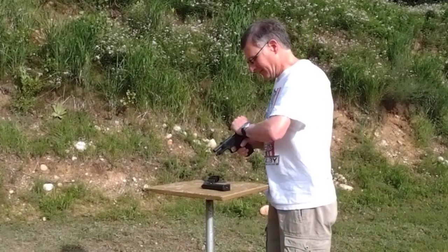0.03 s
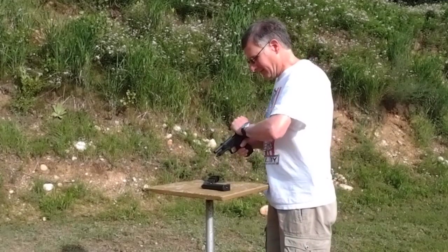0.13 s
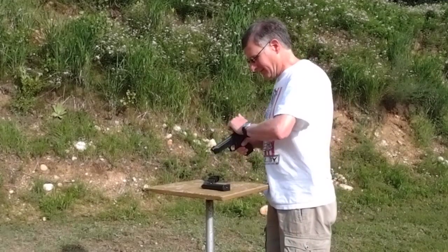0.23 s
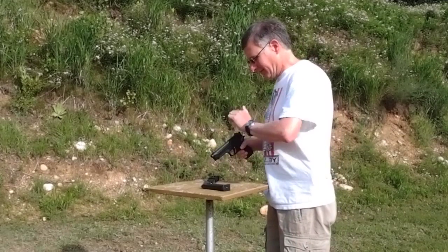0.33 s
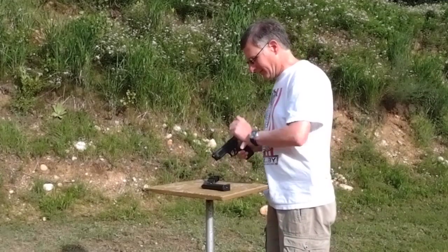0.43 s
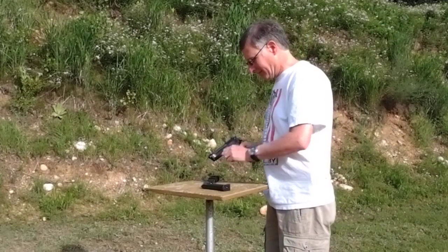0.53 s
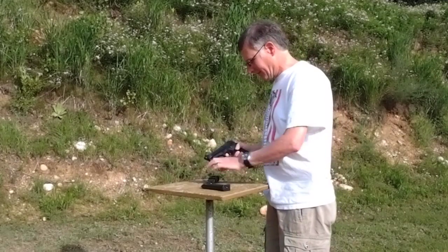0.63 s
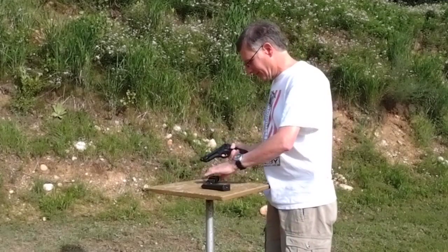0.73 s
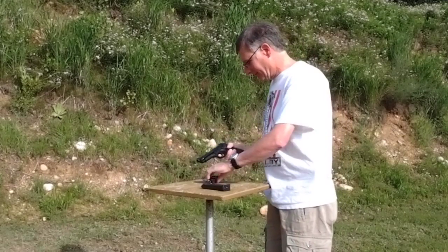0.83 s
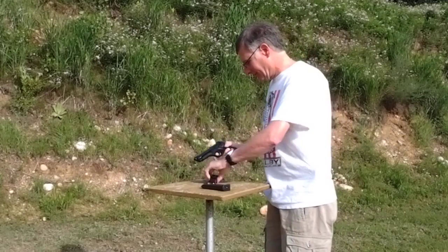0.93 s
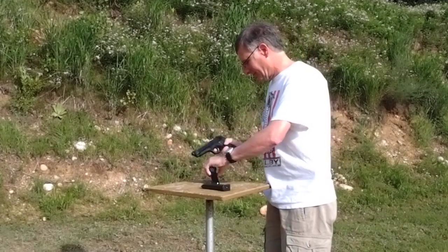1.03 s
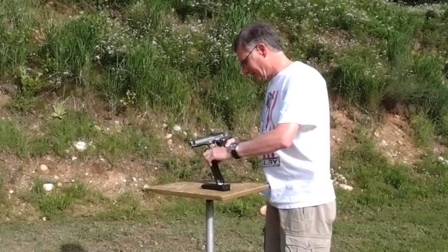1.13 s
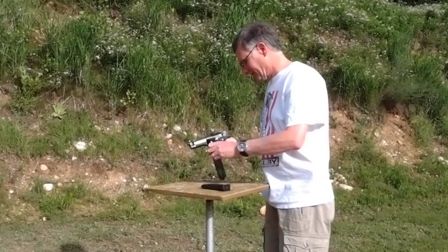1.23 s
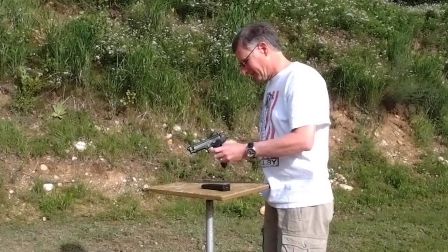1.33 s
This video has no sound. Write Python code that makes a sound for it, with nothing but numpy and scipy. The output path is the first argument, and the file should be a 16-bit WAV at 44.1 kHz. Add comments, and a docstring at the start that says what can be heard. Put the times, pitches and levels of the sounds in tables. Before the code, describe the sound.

Sharp metallic slam of a pistol slide in quiet open air, preceded by faint ticks and a thin squeak, followed by diffuse outdoor reflections, a duller echo, slight cloth rustle, a small click and a magazine tapping wood.

```python
"""A pistol at an outdoor range, over quiet open air with a low distant hum: shaped noise and one sine.
First the grassy bank still scatters an earlier clack, as fading noise, while the steel ticks under the hand.
Then the slide squeaks, rubs along its rails and slams shut: noise bursts and ringing modes that overload
the microphone. The ground echoes the slam softly, the bank returns a wash of noise and a later, duller echo.
Last a sleeve rustles, steel clicks faintly and a magazine knocks on a wooden table, a sum of dying sines."""
import sys
import numpy as np
from scipy import signal
from scipy.fft import rfft, irfft
from scipy.io import wavfile

SR = 44100
rng = np.random.default_rng(int(sys.argv[2]) if len(sys.argv) > 2 else 0)


def digitize_waveform(pressure):
    """Quantize a signal to 16-bit integers and store it at the path in sys.argv[1].

    Rows of a 2-D input are taken as channels; values are limited to [-1, 1].
    """
    field = np.atleast_2d(pressure).T
    bounded = np.clip(field, -1, 1)
    quanta = np.round(bounded * 32767).astype(np.int16)
    wavfile.write(sys.argv[1], SR, quanta)


N = 61740  # length in samples

# Quiet outdoor air. Each row: frequency in Hz, relative level in dB per Hz.
AIR_SPECTRUM = [(30, -26), (45, -3), (75, 1), (120, 2.5), (180, -3), (400, -6.5), (800, -11), (1250, -15.5),
                (3000, -19.5), (7000, -23.5), (8500, -28), (9400, -34.5), (12400, -34.5), (14000, -27.5),
                (15500, -25)]
# Slow swell of the air. Each row: time in seconds, change of level in dB.
AIR_SWELL = [(0, -0.5), (0.2, -0.5), (0.55, 1), (1.0, 1.5), (1.4, 1)]
AIR_DB = -55  # rms before the swell
HUM_HZ, HUM_DB = 54, -62

# Colour of the earlier clack's scatter. Each row: frequency in Hz, relative level in dB per Hz.
EARLIER_SPECTRUM = [(300, -23.5), (1500, -9), (2500, -3), (7000, 0.5), (9500, -4), (15000, -0.5)]
EARLIER_DB = -45.5

# Magazine on the table. Each row: start in seconds, level in dB.
KNOCKS = [(1.078, -56), (1.096, -46)]
# Modes of the wooden top. Each row: frequency in Hz, relative level in dB, 60 dB decay in seconds.
TABLE_MODES = [(282.5, -21, .08), (478.5, -0.5, 0.28), (775, -3, 0.03)]
# Cloth of the sleeve. Each row: frequency in Hz, relative level in dB per Hz.
RUSTLE_SPECTRUM = [(80, -4), (250, 5), (700, 7), (1500, -8.5), (5000, -47), (15000, -32)]
RUSTLE_S, RUSTLE_WIDTH_S, RUSTLE_DB = 1.07, 0.23, -60.5  # centre, half width to 1/e, peak rms

# Scatter from the grassy bank. Each row: frequency in Hz, relative level in dB per Hz.
BANK_SPECTRUM = [(100, -32), (600, -23.5), (1200, -15), (1800, -11), (2300, 1), (3500, -1.5), (4450, 2.5),
                 (5400, -1), (7000, 2), (8300, 1.5), (9600, -3.5), (11300, 1), (14000, 0.5), (15700, -2.5)]
BANK_DB, BANK_RISE_S, BANK_HOLD_S = -23, .028, .045  # the hold counts from the sound, rise included
BANK_T60_S, BANK_TREBLE_T60_S = 0.6, .33
BANK_GRAIN_DB, BANK_GRAINS_PER_S = 1.5, 350
BANK_RING_DB, BANK_RING_T60_S = -27.5, 0.47
# the far echo and the trees are set against the bank's peak
FAR_ECHO_S, FAR_ECHO_WIDTH_S, FAR_ECHO_DB, FAR_TREBLE_DB = .222, 0.016, -16.5, -7.5
TREES_DB, TREES_T60_S = -19, .9  # fainter, longer scatter from further off

# The slide rubs along its rails. Each row: time in seconds, level in dB.
RUB_LEVEL = [(0.186, -63.5), (0.195, -48), (0.210, -50), (0.216, -46.5), (0.222, -29.5), (0.227, -32.5),
             (0.230, -70.5)]
# Colour of the rub. Each row: frequency in Hz, relative level in dB per Hz.
RUB_SPECTRUM = [(200, -28), (1200, -11), (2300, 0), (4300, -7), (7000, -6.5), (10000, -15), (15000, -10)]
RUB_GRAIN_DB, RUB_GRAINS_PER_S = 2.0, 900
# Faint squeak as the slide starts to move. Each row: time in seconds, pitch in Hz, level in dB.
SQUEAK = [(0.134, 3650, -70), (0.145, 3900, -57), (0.156, 4250, -70), (0.17, 4850, -63.5),
          (0.182, 4750, -60), (0.191, 4590, -66.5)]
SQUEAK_ROUGH = .025  # pitch wobble, as a fraction of the pitch

# Steel contacts of the slide, with the slam's soft, diffuse echo off the ground at 0.235 and 0.236.
# Each row: start in seconds, relative level in dB, treble lift in dB, thud lift in dB (weighted in
# steel()), 60 dB decay of the clatter in seconds, relative level of the ringing modes in dB,
# pitch in Hz near which they ring most.
CLACKS = [(0.2146, -32, -7, -2, .02, -3, 3400), (0.2177, -17.5, -8, -8.5, .016, -3.5, 3430),
          (0.2188, -14, -8, -3.5, .014, 1.5, 3700), (0.2272, -0.5, 3.5, -4, .017, 2, 4800),
          (0.2350, -18, 3, 6, .022, 2, 2450), (0.2360, -18.5, -7, 1, .016, 6.5, 3200),
          (0.2388, -6.5, 6, -0.5, 0.017, -2.5, 11300), (0.2428, -20.5, 4, -4.5, .010, -5.5, 11340),
          (0.2448, -16.5, -8, 4, .011, -6, 11340)]
# Light handling ticks. Each row: start in seconds, relative level in dB, treble lift in dB,
# thud lift in dB, clatter decay in seconds, ringing modes in dB, favoured pitch in Hz.
TICKS = [(0.0515, -51, -10.5, 12, 0.023, -1.5, 2496), (0.0615, -45, -20, 3, 0.026, -0.5, 2587),
         (0.0740, -53, -13.5, 8, .025, 6.5, 1414), (0.1070, -52, -13, 1, .02, 1, 1400),
         (0.1115, -47, -17, -0.5, .02, 10, 1407), (0.1972, -33, -10, -13, .016, 6, 2400),
         (0.9900, -42.5, -10.5, 3.5, 0.019, 0, 5930), (0.9975, -50, -28, 1, .03, 1.5, 3200)]
# Ringing of slide and barrel. Each row: frequency in Hz, relative level in dB, 60 dB decay in seconds.
STEEL_MODES = [(1061, -25, .04), (1268, -20, .05), (1608, -21, .045), (2448, -18, .035),
               (2576, -20.5, 0.035), (3623, -14, .014), (4263, -27, 0.078), (4473, -15.5, .03),
               (4910, -15.5, .016), (5840, -15.5, .02), (8116, -21, 0.053), (8650, -16.5, 0.032),
               (11370, -14, .036), (11360, -24.5, .036), (11700, -24.5, 0.011), (14425, -19, 0.021)]
# Dense short-lived modes of the whole gun. Each row: frequency in Hz, relative level in dB per Hz.
CLATTER_SPECTRUM = [(100, -40), (400, -27.5), (800, -12), (1300, -14.5), (2000, -6.5), (2700, -5.5),
                    (3700, 0.5), (4900, -4), (6800, -7), (8500, -10.5), (9600, -9.5), (12000, 0),
                    (14000, -6), (16000, -10)]
TREBLE_HZ, THUD_HZ = 7100, 1900
CLATTER_DB, CRACK_DB, CRACK_T60_S = -5.5, 3.5, .0045
FOCUS_DB, FOCUS_OCTAVES = 9, .35  # lift of the modes near the favoured pitch
MODE_SPREAD_DB = 3.5  # chance spread of the modes, standard deviation
BODY_CUT_HZ = 600  # the small gun radiates little bass

OVERLOAD = 1.05  # ceiling of the soft clipping
BASS_SHELF_DB, BASS_SHELF_HZ = -5.5, 800  # the microphone is lean in the bass
CUTOFF_HZ = 15750


def from_db(db):
    """Decibels to gain."""
    return 10 ** (np.asarray(db) / 20)


def dying(t, t60):
    """Exponential decay from 1, down 60 dB after t60 seconds."""
    return from_db(-60 * t / max(t60, 1e-3))


def noise(spectrum):
    """Noise of rms 1 with the given spectrum, empty below 20 Hz."""
    hz, db = np.transpose(spectrum)
    f = np.maximum(np.fft.rfftfreq(N, 1 / SR), 1)
    gain = from_db(np.interp(np.log(f), np.log(hz), db)) * (f > 20)
    x = irfft(rfft(rng.standard_normal(N)) * gain, N)
    return x / x.std()


def above(f, hz):
    """Smooth step from 0 to 1 around a frequency."""
    return 1 / (1 + (hz / np.maximum(f, 1)) ** 6)


def split(x):
    """The body and the treble of a sound."""
    treble = irfft(rfft(x) * above(np.fft.rfftfreq(N, 1 / SR), TREBLE_HZ), N)
    return x - treble, treble


def flutter(rate):
    """Random wobble with about `rate` new values a second."""
    return np.interp(np.arange(N) / SR * rate, np.arange(N), rng.standard_normal(N))


def add(out, s, x):
    """Mix a sound in from time s."""
    i = max(int(s * SR), 0)
    out[i:i + len(x)] += x[:N - i]


def air():
    """Quiet outdoor hiss, slowly swelling noise, with a low distant hum."""
    t = np.arange(N) / SR
    swell_db = np.interp(t, *np.transpose(AIR_SWELL))
    hiss = from_db(AIR_DB + swell_db) * noise(AIR_SPECTRUM)
    return hiss + from_db(HUM_DB) * np.sin(2 * np.pi * HUM_HZ * t)


def earlier_scatter():
    """The bank still rings from the slide being pulled back; its treble dies faster than its body."""
    t = np.arange(N) / SR
    body, treble = split(noise(EARLIER_SPECTRUM))
    return from_db(EARLIER_DB) * (body * dying(t, BANK_T60_S) + treble * dying(t, BANK_TREBLE_T60_S))


def table():
    """A sleeve rustles as a swell of noise, and the magazine's bumps set the wooden top's modes ringing."""
    t = np.arange(N) / SR
    swell = np.exp(-((t - RUSTLE_S) / RUSTLE_WIDTH_S) ** 2)
    out = from_db(RUSTLE_DB) * noise(RUSTLE_SPECTRUM) * swell
    wood = sum(from_db(db) * np.sin(2 * np.pi * hz * t) * dying(t, t60) for hz, db, t60 in TABLE_MODES)
    for s, db in KNOCKS:
        add(out, s, from_db(db) * wood)
    return out


def bank(x):
    """Countless leaves return the sound's energy as a wash whose treble dies first, with one dull far echo."""
    t, out = np.arange(N) / SR, 0
    echo = from_db(FAR_ECHO_DB) * np.exp(-((t - FAR_ECHO_S) / FAR_ECHO_WIDTH_S) ** 2)
    trees = from_db(TREES_DB) * dying(t, TREES_T60_S)
    body, treble = split(noise(BANK_SPECTRUM))
    dull_echo = echo * from_db(FAR_TREBLE_DB)
    for wash, t60, far in ((body, BANK_T60_S, echo), (treble, BANK_TREBLE_T60_S, dull_echo)):
        near = np.minimum(t / BANK_RISE_S, 1) * dying(np.maximum(t - BANK_HOLD_S, 0), t60)
        returns = near ** 2 + far ** 2 + trees ** 2
        # random paths add in energy, so the squared sound is spread over the return times
        energy = signal.fftconvolve(x ** 2, returns / returns.sum())[:N]
        out = out + wash * np.sqrt(np.abs(energy))
    return from_db(BANK_DB + BANK_GRAIN_DB * flutter(BANK_GRAINS_PER_S)) * out


def returned_ring(ring):
    """A little of the steel's pitch survives in the scatter: the ring convolved with dying noise."""
    response = noise(BANK_SPECTRUM) * dying(np.arange(N) / SR, BANK_RING_T60_S)
    return from_db(BANK_RING_DB) * signal.fftconvolve(ring, response / np.linalg.norm(response))[:N]


def rails():
    """Steel squeaks thinly with a rough pitch, then rubs with a grainy hiss that builds into the slam."""
    t = np.arange(N) / SR
    rub_db = np.interp(t, *np.transpose(RUB_LEVEL), left=-np.inf, right=-np.inf)
    rub = from_db(rub_db + RUB_GRAIN_DB * flutter(RUB_GRAINS_PER_S)) * noise(RUB_SPECTRUM)
    s, hz, db = np.transpose(SQUEAK)
    pitch = np.interp(t, s, hz) * (1 + SQUEAK_ROUGH * flutter(RUB_GRAINS_PER_S))
    squeak_level = np.interp(t, s, from_db(db), left=0, right=0)
    return rub + squeak_level * np.sin(2 * np.pi * np.cumsum(pitch) / SR)


def steel(strikes):
    """Each contact, or its ground echo, is a crack, a clatter of dense modes and a ring; (clatter, ring)."""
    clatter, ring = np.zeros((2, N))
    t, f = np.arange(N // 4) / SR, np.fft.rfftfreq(N, 1 / SR)
    for s, db, treble_db, thud_db, t60, ring_db, focus_hz in strikes:
        # the thud lift counts 1.5 times below THUD_HZ and half above it
        colour = from_db(treble_db * above(f, TREBLE_HZ) + thud_db * (1.5 - above(f, THUD_HZ)))
        burst = irfft(rfft(noise(CLATTER_SPECTRUM)) * colour, N)[:len(t)]
        clatter_decay = from_db(db + CLATTER_DB) * dying(t, t60)
        crack_decay = from_db(db + CRACK_DB) * dying(t, CRACK_T60_S)
        add(clatter, s, burst * (clatter_decay + crack_decay))
        chances = rng.standard_normal(len(STEEL_MODES))
        for k, ((hz, mode_db, ring_s), chance) in enumerate(zip(STEEL_MODES, chances)):
            lift_db = FOCUS_DB * np.exp(-(np.log2(hz / focus_hz) / FOCUS_OCTAVES) ** 2)
            level_db = db + mode_db + ring_db + lift_db + MODE_SPREAD_DB * chance
            level = (-1) ** k * from_db(level_db) * np.interp(hz, f, colour)  # alternate polarity
            add(ring, s, level * np.sin(2 * np.pi * hz * t) * dying(t, ring_s))
    return clatter, ring


def scene():
    """The air, the table, the pistol and its scatter."""
    clatter, ring = steel(CLACKS + TICKS)
    body_cut = signal.butter(2, BODY_CUT_HZ, "high", fs=SR, output="sos")
    pistol = signal.sosfilt(body_cut, clatter + ring + rails())
    scatter = bank(pistol) + returned_ring(ring) + earlier_scatter()
    return (air() + table() + scatter + pistol)[None]


def record(dry):
    """The slam overloads the microphone, which clips softly; the bass is thinned and the top is cut."""
    clipped = OVERLOAD * dry / (OVERLOAD ** 4 + dry ** 4) ** .25
    bass = signal.sosfilt(signal.butter(1, BASS_SHELF_HZ, fs=SR, output="sos"), clipped)
    lean = clipped + (from_db(BASS_SHELF_DB) - 1) * bass
    return signal.sosfilt(signal.ellip(10, .2, 70, CUTOFF_HZ, fs=SR, output="sos"), lean)


dry = scene()
out = record(dry)
digitize_waveform(out)
```